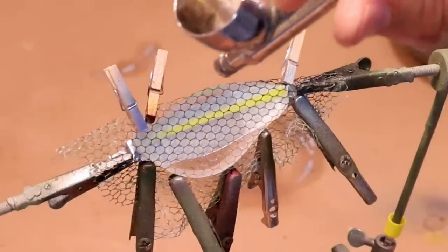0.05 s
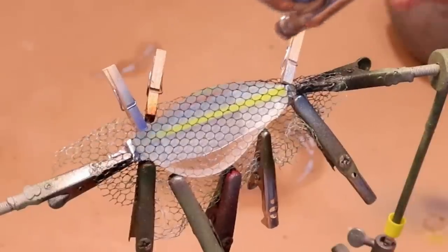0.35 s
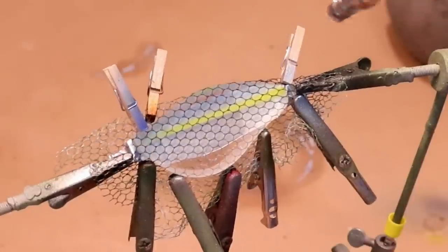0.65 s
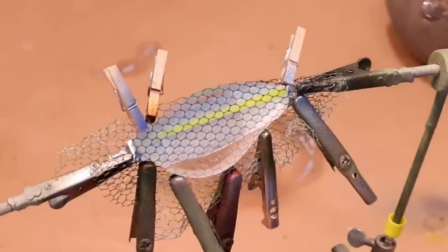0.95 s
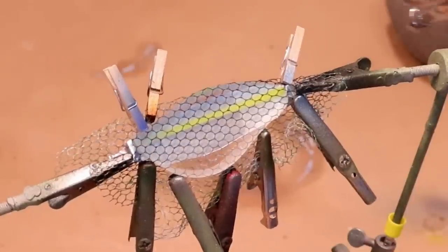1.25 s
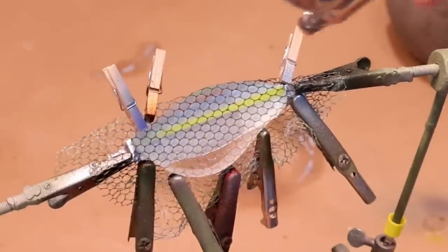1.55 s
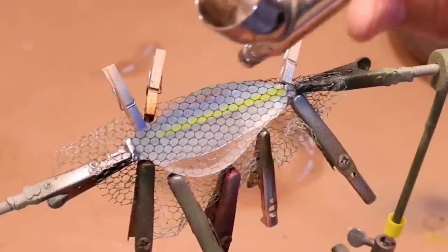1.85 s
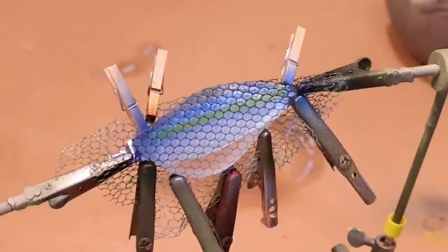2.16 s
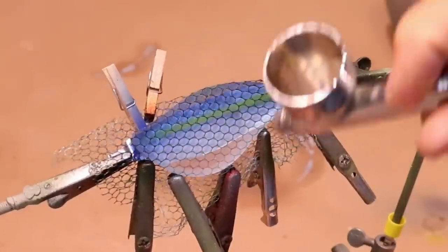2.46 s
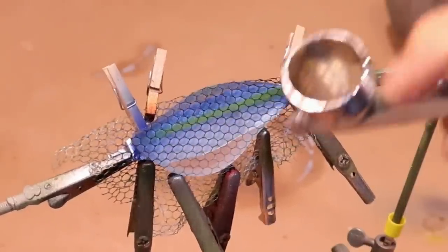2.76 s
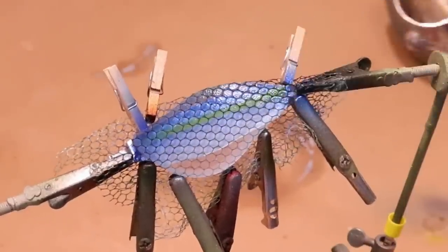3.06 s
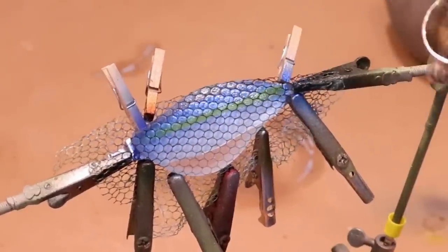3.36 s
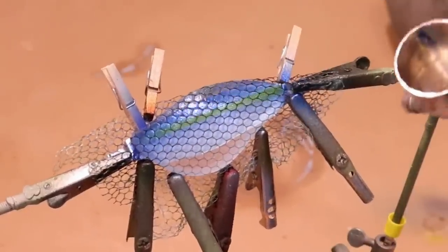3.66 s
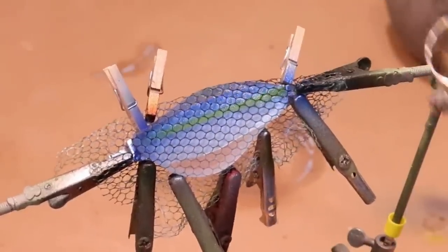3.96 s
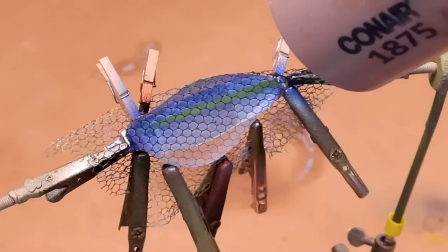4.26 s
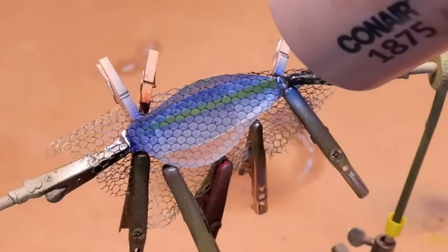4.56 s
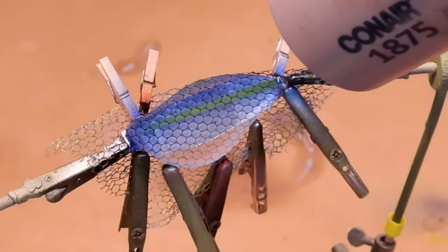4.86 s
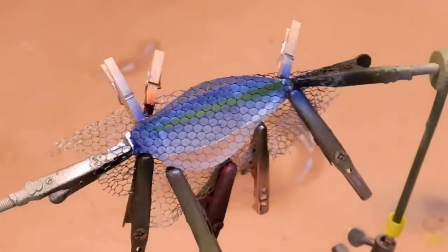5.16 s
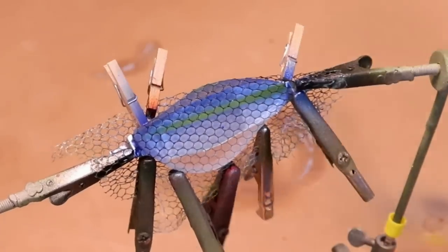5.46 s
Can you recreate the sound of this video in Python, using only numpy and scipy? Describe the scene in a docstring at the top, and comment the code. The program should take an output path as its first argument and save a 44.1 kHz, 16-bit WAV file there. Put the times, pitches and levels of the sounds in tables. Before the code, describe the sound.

An airbrush is hissing from the start, close to the microphone in a small workshop. Its jet swells into an airy, slightly whistling roar as it crosses a small clamped model, and the trigger snaps back at about 1 second. A second burst runs from 1.2 to 2.1 seconds and is cut off on a dull knock. The third lasts from 2.4 to 2.9 seconds, ending with a snap and a small steel ping. The fourth runs from 3.2 to 3.9 seconds and ends with another snap, followed by a light tick. At about 4.3 seconds a hair dryer comes in abruptly, already running, with a steady rush of air and a high fan whine. It is switched off at about 5.3 seconds, the whine falling and the air dulling as it slows. A ventilator hums very faintly underneath.

```python
"""A small workshop, close to the bench, one microphone. An airbrush sprays a small clamped model in four
bursts: the nozzle hisses, the jet roars where it strikes the work, and the trigger snaps back with a
steel ping. A cut ends the second burst on a dull knock. After the fourth, the scene changes to a
running hair dryer, its fan whining and driving air through the grille until it is switched off and
spins down. A ventilator hums faintly behind it all."""
import sys
import numpy as np
from scipy import signal
from scipy.fft import rfft, irfft, next_fast_len
from scipy.io import wavfile
from scipy.ndimage import map_coordinates

SR = 44100
rng = np.random.default_rng(int(sys.argv[2]) if len(sys.argv) > 2 else 0)


def generate_wav(signal):
    """Clip the signal to [-1, 1] and save it as 16-bit WAV at the path in sys.argv[1]."""
    frames = np.transpose(np.atleast_2d(signal))
    scaled = np.clip(frames, -1, 1) * 32767
    pcm = np.round(scaled).astype(np.int16)
    wavfile.write(sys.argv[1], SR, pcm)


N = 251325
TIME = np.arange(N) / SR
CUT_S, DRYER_S = 2.0915, 4.2595  # the second burst is cut short; the dryer comes in


def amp(db):
    """Decibels to gain."""
    return 10 ** (np.asarray(db) / 20)


def unit(x):
    """Scaled to rms 1."""
    return x / np.sqrt(np.mean(x ** 2) + 1e-20)


def along(points, hz):
    """(f/Hz, value) points joined on a log frequency axis."""
    f, values = np.transpose(points)
    return np.interp(np.log(hz + 1), np.log(f + 1), values)


def wobble(rate):
    """A smooth random curve, rate knots a second."""
    return map_coordinates(rng.standard_normal(int(N * rate / SR) + 4), [TIME * rate])


def swell(at_s, half_s):
    """A bell-shaped rise and fall."""
    return np.exp(-((TIME - at_s) / half_s) ** 2)


def decay(start, t60):
    """An envelope that jumps to 1 and dies away."""
    return (TIME >= start) * amp(-60 * np.maximum(TIME - start, 0) / t60)


def filtered(x, response):
    """x shaped by a frequency response."""
    size = next_fast_len(N + SR // 2)
    return irfft(rfft(x, size) * response(np.fft.rfftfreq(size, 1 / SR)), size)[:N]


def noise(spectrum):
    """Noise of rms 1, shaped by (f/Hz, relative level/dB) points."""
    return unit(filtered(rng.standard_normal(N), lambda hz: amp(along(spectrum, hz))))


def resonant(modes):
    """Noise of rms 1 ringing in (f/Hz, width/Hz, relative level/dB) resonances, whose powers add."""
    def response(f):
        power = 0
        for hz, width, db in modes:
            detuning = (f * f - hz * hz) / (2 * width * (f + 1))
            power += (amp(db) / (1 + detuning ** 2)) ** 2
        return np.sqrt(power)
    return unit(filtered(rng.standard_normal(N), response))


def ring(start, modes, attack_s=0.0003):
    """Damped modes struck at one moment; a softer blow starts them more slowly."""
    age = TIME - start
    rise = np.clip(age / attack_s, 0, 1)
    return rise * sum(amp(db) * decay(start, t60) * np.sin(2 * np.pi * hz * age) for hz, db, t60 in modes)


def workshop(x, wet_db):
    """Close sound plus a short, diffuse room tail that keeps changing, its treble dying first."""
    # the room's decay: f/Hz, t60/s
    room = [(200, 0.24), (2000, 0.2), (7000, 0.22), (15000, 0.13)]
    block, echo = SR // 8, np.zeros(N + SR)
    for start in range(0, N, block):
        hz, t, bins = signal.stft(rng.standard_normal(SR // 3), SR, nperseg=256)
        damping = amp(-60 * t / along(room, hz)[:, None])
        tail = signal.istft(bins * damping, SR, nperseg=256)[1]
        reflections = signal.fftconvolve(x[start:start + block], tail / np.linalg.norm(tail))
        echo[start + SR // 300:][:len(reflections)] += reflections
    return (x + amp(wet_db) * echo[:N]) / np.hypot(1, amp(wet_db))


def room_tone():
    """Quiet air and a ventilator's hum; a soft rustle swells as the dryer is picked up."""
    # room air: f/Hz, relative level/dB
    air = [(15, -44), (25, -32), (133, -9), (246, 2.5), (359, -2.5), (509, -7), (614, -4.5), (1110, -8),
           (1530, -11), (1710, -11), (9300, -18.5), (13900, -19), (15500, -24.5)]
    # ventilator tones: f/Hz, level/dB
    tones = [(105, -78), (500.6, -68), (750, -73)]
    hum = sum(amp(db + 0.58 * wobble(5.1)) * np.sqrt(2) * np.sin(2 * np.pi * hz * TIME)
              for hz, db in tones)
    rustle = noise([(80, -21), (400, 1), (2500, -3), (8000, -14), (15000, -28)])
    return amp(-62) * noise(air) + hum + amp(-57) * swell(DRYER_S, half_s=0.092) * rustle


def knock():
    """A dull knock on the bench dies away in the room."""
    # bench modes: f/Hz, level/dB, t60/s
    bench = [(306, -36, 0.2), (372, -31.5, 0.18), (619, -36, 0.11)]
    thud = noise([(40, -28), (150, -8), (400, 4), (1100, 0), (3000, -6), (8000, -22), (15000, -44)])
    return ring(CUT_S, bench, attack_s=0.0018) + amp(-37.5) * decay(CUT_S, t60=0.27) * thud


def fan_whine(drive, full_speed_hz=273.8):
    """The fan whines at multiples of its shaft rate; the housing lifts tones on its resonances."""
    # fan tones: shaft multiple, level before the lift/dB
    orders = [(1, -52.5), (2, -53.5), (7, -58.5), (10, -47.5), (14, -55.5), (21, -56)]
    # the housing's lift: f/Hz, gain/dB
    lift = [(130, -25), (170, -8.5), (1200, -1), (1620, 5), (1800, 12.5), (2030, 11), (2130, -4), (2620, 5),
            (2740, -2), (3000, -2), (3700, 6), (3834, 16.5), (3950, -12), (4700, -2), (5300, 9),
            (5750, 4.5)]
    shaft_hz = full_speed_hz * drive
    jitter = 0.00051 * wobble(15) + 0.07 * (1 - drive) * wobble(250)  # rougher as it slows
    angle = 2 * np.pi * np.cumsum(shaft_hz * (1 + jitter)) / SR
    whine = np.zeros(N)
    for order, db in orders:
        level = amp(db + along(lift, order * shaft_hz) + 1.2 * wobble(30))
        whine += level * np.sqrt(2) * np.sin(order * angle)
    return drive * whine


def dryer(off_s=5.29, coast_s=0.4, air_lag_s=0.03, roar_db=-31, grille_db=-35):
    """Close by, the fan drives air through duct, housing and grille; the rush dulls as it slows."""
    # air in the duct: f/Hz, relative level/dB
    duct_air = [(47, -88), (80, -67), (113, -30.5), (210, -46), (268, -24.5), (319, -30), (413, -19),
                (694, -18), (899, -17), (1120, -5), (1250, -11), (1510, -8), (1740, -17), (1960, -10.5),
                (2500, -19), (3250, -60), (5500, -120)]
    # air through the grille: f/Hz, relative level/dB
    grille_air = [(1350, -44), (2300, -5), (2740, -0.5), (2990, -4.5), (3670, -2.5), (3750, -5), (3970, -4),
                  (4470, -9), (5570, -5.5), (6370, -10.5), (10200, -17), (13300, -21.5), (15200, -38)]
    # housing resonances: f/Hz, width/Hz, relative level/dB
    housing_modes = [(912, 41, -2), (1121, 50, 1.5), (1540, 50, -6), (2754, 49, -5), (3410, 48, -9.5)]
    # the coasting fan's rush: f/Hz, width/Hz, relative level/dB
    coast_modes = [(690, 70, 1), (950, 110, 1), (2080, 120, -11), (4960, 170, -15)]
    drive = np.exp(-np.maximum(TIME - off_s, 0) / coast_s)
    flow = np.exp(-np.maximum(TIME - off_s - air_lag_s, 0) / coast_s)  # the air outlasts the drive
    duct = amp(-3.5) * flow ** 1.52 * noise(duct_air)
    housing = amp(-3 + wobble(40)) * flow ** 3 * resonant(housing_modes)  # eddies make it flutter
    coast = amp(0.5) * np.sqrt(1 - flow) * flow ** 1.8 * resonant(coast_modes)
    grille = flow ** 2.5 * noise(grille_air)
    air = amp(roar_db) * (duct + housing + coast) + amp(grille_db) * grille
    dip_db = -4 * swell(4.567, half_s=0.014)  # the level dips briefly
    waver = amp(dip_db + 0.28 * wobble(12))
    return fan_whine(drive) + workshop(waver * air, wet_db=-10.5)


def trigger():
    """The sprung trigger hits its stop and rings the steel body, whose close modes beat; taps only tick."""
    # trigger releases: t/s, contact level/dB, ping gain/dB, contact t60/s
    releases = [(0.993, -22.5, -48, 0.027), (2.8985, -21.5, -34, 0.045), (3.887, -21, -46, 0.041)]
    # contact at the stop: f/Hz, relative level/dB
    snap = [(40, -36), (300, -4), (1400, -12.5), (2300, -2), (4000, -2), (5500, -6), (6800, -6), (9500, -8),
            (14500, -11), (16000, -8)]
    # steel body modes: f/Hz, relative level/dB, t60/s
    steel = [(2260, -4, .04), (2950, -19, 0.051), (3360, -5, 0.12), (5240, 4, 0.053), (8404, -11, 0.39),
             (8490, 7, 0.1), (8625, -20, .12)]
    # light taps of finger and trigger: t/s, level/dB, t60/s
    taps = [(2.36, -58, 0.086), (3.148, -53, 0.06), (4.060, -48, 0.047)]
    # the tapped body: f/Hz, width/Hz, relative level/dB
    tap_modes = [(2380, 180, 2), (5640, 520, -8), (8400, 300, -13), (12500, 3500, -18)]
    contact, body = noise(snap), resonant(tap_modes)
    snaps = sum(amp(db) * decay(t, t60) * contact + amp(ping_db) * ring(t, steel)
                for t, db, ping_db, t60 in releases)
    ticks = sum(amp(db) * decay(t, t60) * body for t, db, t60 in taps)
    return snaps + ticks


def whistles():
    """Breathy tones swell and fade as the jet crosses an edge."""
    # edge tones: t/s, half length/s, f/Hz, width/Hz, level/dB
    tones = [(0.717, 0.17, 4540, 400, -38.5), (0.71, 0.16, 1350, 107, -35),
             (1.306, 0.084, 2140, 484, -34.5), (2.597, 0.062, 5080, 299.7, -38.5),
             (2.667, 0.041, 11900, 500, -31), (3.552, 0.34, 2700, 200, -48)]
    return sum(amp(db) * swell(t, half) * resonant([(hz, width, 0)]) for t, half, hz, width, db in tones)


def pull(on, off, finger_s=0.012):
    """The finger draws the trigger back, 0 to 1, and lets it go."""
    return (np.tanh((TIME - on) / finger_s) - np.tanh((TIME - off) / finger_s)) / 2


def spray(bursts, puff_db, open_db_per_s=950, close_db_per_s=1400):
    """Close up, the valve lets out a hissing jet; paint thickens it, and it roars on each pass."""
    # paint let in by the trigger: from t/s, to t/s, hiss gain/dB, fizz gain/dB
    pulls = [(0.243, 0.966, 5, 2.5), (1.314, 2.102, 3, 3.5), (2.499, 2.893, 2.5, 6.5)]
    # sweeps across the work: t/s, half length/s, wash gain/dB, edge gain/dB, hiss gain/dB
    passes = [(0.025, 0.049, 2, -0.5, -0.5), (0.456, 0.22, 12.5, 12.5, 0.5), (0.797, 0.23, 12.5, 16.5, 1),
              (1.267, 0.13, 7, 11, .5), (1.653, 0.25, 11.5, 12.5, -0.2), (2.013, 0.19, 8, 8, 0.5),
              (2.54, 0.065, 9, 9.5, 4.5), (2.754, 0.1, 8, 10, .5), (3.325, 0.068, 3.5, 3.5, 1),
              (3.53, 0.097, 8, 5, 1.5), (3.73, 0.045, 9, 7.5, 1.5), (3.872, 0.067, 7.5, 6.5, .3)]
    # air resonances over the bench: f/Hz, width/Hz, relative level/dB
    wash_modes = [(461, 29, 0), (500, 11, -7.5), (600, 26, -2.5), (675, 157, -1), (741, 53, 0.5),
                  (840, 110, -17), (965, 50, -1), (1066, 75, -5)]
    # air resonances among the work and its clamps: f/Hz, width/Hz, relative level/dB
    edge_modes = [(1291, 45, 2), (1360, 69, 0), (1496.4, 49, -0.5), (1606, 28, -3.5), (1750, 240, -5),
                  (2053, 93, -3.5), (2244, 38, -1), (2435, 82, -1.5), (2650, 64, -1.5), (3015, 60, -7),
                  (3400, 620, -11.5)]
    # the jet's hiss: f/Hz, relative level/dB
    jet_hiss = [(1000, -27), (3000, -0.5), (4000, -1.5), (4500, 0), (5600, 2), (6400, 3), (7600, 3.5),
                (8400, 3.5), (9400, 0), (12000, -12.5), (16000, -27)]
    # the nozzle's fizz: f/Hz, relative level/dB
    nozzle_fizz = [(7000, -26), (9500, -6), (10400, -2.5), (11200, -2.5), (11800, 1), (13000, -0.5),
                   (14400, -7), (15200, -14), (15800, -33)]
    # the air stream's low puff: f/Hz, relative level/dB
    stream = [(30, -48), (70, -42), (120, -15), (190, -6.5), (240, -2.5), (268, -5), (300, 2), (340, -1),
              (400, -3.5), (600, 6.5), (1200, -48)]
    paint_db, mist_db = sum(np.outer(gains, pull(on, off)) for on, off, *gains in pulls)
    wash_db, edge_db, scatter_db = sum(np.outer(gains, swell(t, half)) for t, half, *gains in passes)
    valve, jet, nozzle = np.zeros((3, N))
    for opens, closes, hiss_db, fizz_db, swell_db_per_s in bursts:
        before, after = np.maximum(opens - TIME, 0), np.maximum(TIME - closes, 0)
        flow = amp(-open_db_per_s * before - close_db_per_s * after)
        valve += flow
        jet += flow * amp(hiss_db + paint_db + scatter_db)
        nozzle += flow * amp(fizz_db + mist_db + swell_db_per_s * (TIME - opens))
    idle_wash_db, idle_edge_db = -42.5, -44.5  # while the jet points past the work
    eddies = wobble(35)
    wash = amp(idle_wash_db + wash_db + 0.59 * eddies) * resonant(wash_modes)
    edges = amp(idle_edge_db + edge_db + 0.54 * eddies) * resonant(edge_modes)
    hiss = amp(0.52 * wobble(60)) * noise(jet_hiss)
    fizz = amp(0.24 * wobble(40.6)) * noise(nozzle_fizz)
    # the low puff follows the air flow more than the surface it meets
    puff = amp(puff_db + 0.21 * wash_db + 0.12 * mist_db) * noise(stream)
    return valve * (wash + edges + puff + whistles()) + jet * hiss + nozzle * fizz


def scene():
    """Two pairs of bursts, then the dryer, in mono; each channel has its own faint low rumble and hiss."""
    # air valve presses: open t/s, close t/s, base hiss level/dB, base fizz level/dB, fizz swell/(dB/s)
    bursts = [(0.0, 0.998, -38, -33.5, 0.1), (1.196, 2.1, -36.5, -35, 2.5), (2.395, 2.882, -38.5, -35, -7),
              (3.173, 3.886, -38.2, -34.5, 1.5)]
    cut = np.clip((CUT_S - TIME) / 0.0029 + 0.5, 0, 1)  # takes the room's tail with it
    first_pair = workshop(spray(bursts[:2], puff_db=-44), wet_db=-11) * cut
    second_pair = workshop(spray(bursts[2:], puff_db=-43.5), wet_db=-10)
    mono = first_pair + second_pair + knock() + dryer() * (TIME >= DRYER_S)
    mono += workshop(trigger(), wet_db=-11.5) + room_tone()
    faint_noise = [noise([(25, 13), (200, -6.5), (1500, -28.5), (15000, -22)]) for channel in range(2)]
    return mono + amp(-70.5) * np.array(faint_noise)


def record(dry):
    """The microphone chain rolls off the deep bass and keeps nothing above its band limit."""
    low_hz, top_hz = 55, 15830
    low_cut = signal.butter(2, low_hz, "highpass", fs=SR, output="sos")
    return np.array([filtered(signal.sosfilt(low_cut, x), lambda hz: hz < top_hz) for x in dry])


dry = scene()
out = record(dry)
generate_wav(out)
```